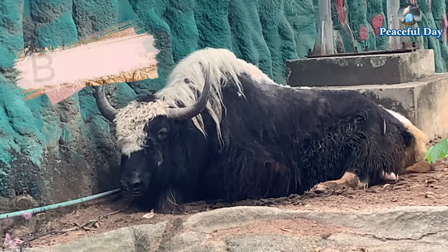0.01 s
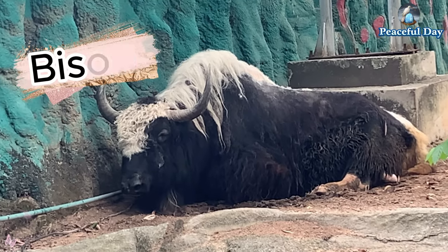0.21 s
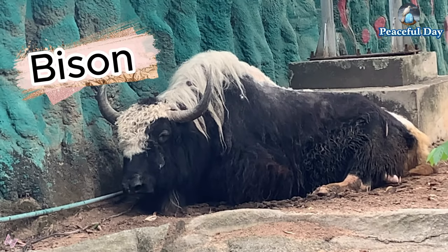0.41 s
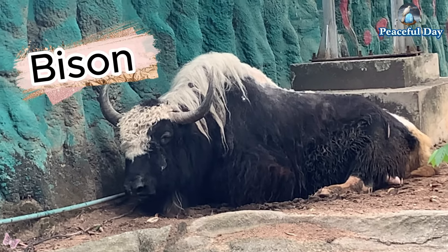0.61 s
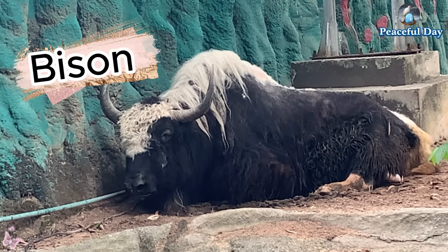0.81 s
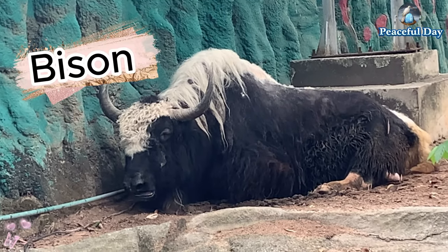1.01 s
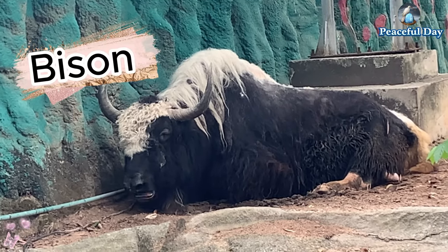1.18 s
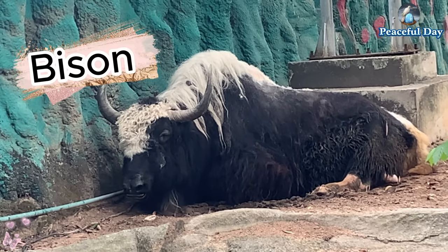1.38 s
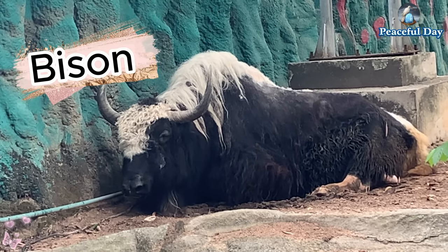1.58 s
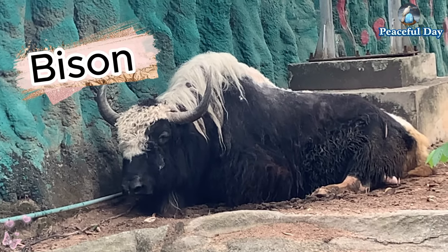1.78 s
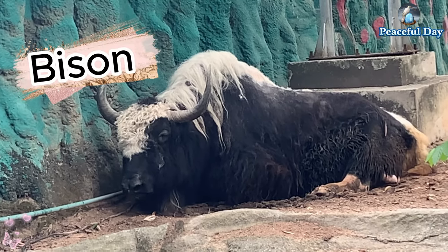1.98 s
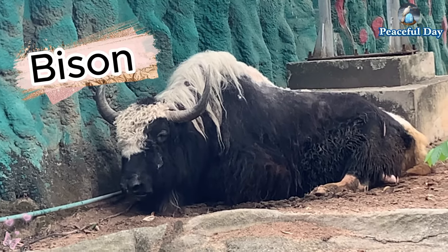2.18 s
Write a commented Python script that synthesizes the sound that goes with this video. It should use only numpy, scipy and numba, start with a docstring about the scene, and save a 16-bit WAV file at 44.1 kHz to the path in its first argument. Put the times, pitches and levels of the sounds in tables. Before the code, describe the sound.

Two deep rattling grunts from a big resting bovine in a stone pen, with dry rustles and faint air.

```python
"""Bovine grunting in a stone pen

A big bovine lying in a stone pen grunts twice, heard on one microphone: slow vocal-fold pulses and
puffs of breath ring chest, throat, mouth and palate, and the walls add a short dull reverberation.
Dry litter crackles and rustles as filtered grains and noise bursts; a far bird trills in tiny rising whistles.
Wind bumps the microphone as low filtered noise, and shaped noise makes the outdoor hiss under all."""
import sys
import numpy as np
from scipy import signal
from scipy.fft import rfft, irfft
from scipy.io import wavfile
from scipy.ndimage import uniform_filter1d
from numba import njit

SR = 44100
rng = np.random.default_rng(int(sys.argv[2]) if len(sys.argv) > 2 else 0)


def rack_gain(trim_db):
    """Turn a fader trim in dB into the linear factor to multiply a signal by."""
    fader = np.asarray(trim_db, float)
    return 10 ** (fader / 20)


def master_out(mix):
    """Clip the mix to full scale and print it as 16-bit PCM to the path in sys.argv[1]."""
    frames = np.transpose(np.atleast_2d(mix))
    ceiling = np.clip(frames, -1, 1)
    pcm = np.round(ceiling * 32767).astype(np.int16)
    wavfile.write(sys.argv[1], SR, pcm)


N = 99225
T = np.arange(N) / SR


def level(x, db):
    """Scale to an rms level."""
    return x * rack_gain(db) / np.sqrt(np.mean(x ** 2))


def ring(x, hz, width):
    """Two-pole resonance, gain 1 at the centre."""
    return signal.lfilter(*signal.iirpeak(hz, hz / width, SR), x)


def bell(mid, half):
    """Smooth swell around a moment."""
    return np.exp(-((T - mid) / half) ** 2)


def walk(rate):
    """Random levels held 1 / rate s and slewed; spread near 1."""
    hold = int(SR / rate)
    steps = np.repeat(rng.standard_normal(N // hold + 1), hold)
    return 1.11 * uniform_filter1d(steps, hold)[:N]


@njit
def svf(x, g, q):
    """Band-pass whose centre (g = tan(pi Hz / SR)) may move every sample, gain 1 at the centre."""
    y, b, l = np.empty(len(x)), 0., 0.
    for i in range(len(x)):
        v = (b + g[i] * (x[i] - l)) / (1 + g[i] * (g[i] + 1 / q))
        b, l, y[i] = 2 * v - b, l + 2 * g[i] * v, v / q
    return y


def steep(x, hz, q):
    """Moving resonance with a second, wider pass that darkens the valleys."""
    g = np.tan(np.pi * hz / SR)
    return svf(svf(x + 1e-18, g, 1. * q), g, .7 * q)


def cavity(x, peaks, tuning, qs):
    """Several resonances side by side, all moved by one tuning ratio; higher ones weigh less."""
    return sum(rack_gain(db) / np.sqrt(hz) * steep(x, hz * tuning, q) for (hz, db), q in zip(peaks, qs))


def fold_pulses(rate):
    """Vocal-fold closures: single-sample pulses at a moving rate, uneven in time and strength."""
    jitter_s, shimmer_db = .0008, 1.5
    rate = np.array(rate)
    phase = np.cumsum(np.interp(T, *rate.T)) / SR
    # before jitter, one pulse falls on the first time of the table
    phase = phase - np.interp(rate[0, 0], T, phase)
    chance = rng.standard_normal((200, 2))
    when = np.interp(np.arange(-70, 130), phase, T) + jitter_s * chance[:, 0]
    inside = (when > .01) & (when < T[-1] - .01)
    pulses = np.zeros(N)
    pulses[(when[inside] * SR).astype(int)] = rack_gain(shimmer_db * chance[inside, 1])
    return pulses


def breath_puffs(pulses):
    """Turbulent air behind each closure: noise that swells and fades after the pulse."""
    puff_s = .0035  # mean delay of the swell behind its pulse
    t = T[:SR // 20]
    gate = signal.fftconvolve(pulses, t * np.exp(-2 * t / puff_s))[:N]
    return level(gate * rng.standard_normal(N), 0)


def grunt(rate, voice, shape, chest, throat, mouth, mouth_q, palate, breath):
    """Each fold closure is a pulse with a puff of air behind it; chest, throat, mouth and palate ring with them."""
    voice, shape = np.array(voice), np.array(shape)
    pulses = fold_pulses(rate)
    puff = breath_puffs(pulses)
    pulses = level(pulses, 0)
    source = pulses + breath * puff
    still = np.ones(N)
    throat_tuning, mouth_tuning = (np.interp(T, shape[:, 0], shape[:, k]) for k in (1, 2))

    def chest_body(x):
        return steep(x, chest[0] * still, chest[0] / chest[1])

    def throat_body(x):
        return steep(x, throat[0] * throat_tuning, throat[0] / throat[1])

    def mouth_body(x):
        return cavity(x, mouth, mouth_tuning, mouth_q)

    def palate_body(x):
        return cavity(x, palate, still, [11] * len(palate))

    def part(drive, body, over_chest_db):
        db = voice[:, 1] + over_chest_db
        effort = rack_gain(np.interp(T, voice[:, 0], db, left=-120, right=-120))
        # scaled by how loud the body rings under a steady drive
        return body(drive * effort) / np.std(body(drive))

    return (part(source, chest_body, 0)
            + part(source, throat_body, voice[:, 2])
            + part(source, mouth_body, voice[:, 3])
            + part(pulses + puff / 2, palate_body, voice[:, 4]))


def first_grunt():
    """Fold pulses through a narrow chest and throat and a mouth strongest at its middle resonance."""
    # vocal-fold pulse rate: (time [s], rate [pulses per s])
    pulse_rate = [(0.238, 39.08), (0.33, 37.91), (0.45, 45.91), (0.52, 38.86), (0.62, 30.86), (0.75, 27.33),
                  (0.9, 24.23), (1.1, 26.65)]
    # effort and balance: (time [s], chest level [dB], throat, mouth, palate rattle [dB over chest])
    voice_levels = [(.1, -47, 3.5, -13, -18), (.125, -46, 13.5, -5, 6), (.155, -59, 11, -3, -5),
                    (.18, -53.5, 11.5, -3, -9), (.24, -47.5, 16.5, 3.5, -11), (.29, -45.5, 13.5, -5, 2.5),
                    (.33, -33, 6.5, -6.5, -12), (0.359, -30.5, 3.5, -16, -24), (.39, -18, -14, -24.5, -32),
                    (.45, -25.5, 3, -14, -14), (.53, -28, 5.5, -13.5, -20), (.6, -33, 7.5, -8.5, -26),
                    (.66, -26, 2.5, -19.5, -40), (.72, -23.5, -1.5, -27, -31), (.78, -29, -0.5, -36, -35),
                    (.83, -39.5, 6.5, -17, -47), (.92, -34, -8, -26, -42), (1.01, -31.5, -23, -33, -40),
                    (1.08, -47.5, -13, -35, -40), (1.14, -63, -17, -28, -44)]
    # tract shape: (time [s], throat tuning [frequency ratio], mouth tuning [frequency ratio])
    tract_shape = [(.2, 0.99, 0.77), (0.289, 1.03, 0.91), (.36, 1.02, 1.04), (.45, 0.99, 1.005),
                   (.62, 0.962, 0.909), (0.749, 0.9, 1.08), (.92, 0.84, 0.63)]
    # mouth resonances at tuning 1: (centre [Hz], weight before the tilt to the lows [dB])
    mouth_peaks = [(370, -10), (503, 17), (700, -17)]
    # palate resonances: (centre [Hz], weight before the tilt to the lows [dB])
    palate_peaks = [(960, 4.5), (1400, -8), (2800, -21)]
    # chest and throat: (centre at tuning 1 [Hz], width of the first pass [Hz]); breath: rms over pulse rms
    return grunt(pulse_rate, voice_levels, tract_shape, chest=(154, 24), throat=(228, 28),
                 mouth=mouth_peaks, mouth_q=(6, 11, 3), palate=palate_peaks, breath=.2)


def second_grunt():
    """Fold pulses with less breath, through a wider throat and a mouth strongest at its lowest resonance."""
    # vocal-fold pulse rate: (time [s], rate [pulses per s])
    pulse_rate = [(1.201, 29.15), (1.32, 21.85), (1.45, 27.95), (1.56, 31.8), (1.68, 31.43), (1.78, 29.29),
                  (1.87, 28.4), (1.95, 22.28), (2.05, 23.97)]
    # effort and balance: (time [s], chest level [dB], throat, mouth, palate rattle [dB over chest])
    voice_levels = [(1.17, -40, -14, -4, -40), (1.21, -40, -19, -11, -35), (1.28, -40, -10.5, -25, -42),
                    (1.33, -38.5, -15, -9, -35), (1.38, -32.5, -15, -16, -30), (1.47, -35.5, -9, -8, -19),
                    (1.55, -33, -4.5, -7, -21.5), (1.63, -35.5, -2.5, -6, -16.5),
                    (1.7, -32.5, -1.5, -4.5, -12), (1.75, -29, -1, -10.5, -22.5),
                    (1.81, -34.5, 2, -8, -16.5), (1.88, -34.5, -8, -7.5, -26), (1.96, -35, -4, -11, -44),
                    (2.06, -43.5, -9, -13, -36), (2.15, -51, -16, -25, -43), (2.25, -50, -12, -17, -40)]
    # tract shape: (time [s], throat tuning [frequency ratio], mouth tuning [frequency ratio])
    tract_shape = [(1.35, 0.98, 1.02), (1.6, 0.86, 1), (1.72, 0.91, 1.057), (1.95, 0.82, 0.75)]
    # mouth resonances at tuning 1: (centre [Hz], weight before the tilt to the lows [dB])
    mouth_peaks = [(390, 12.5), (640, 2), (900, -19)]
    # palate resonances: (centre [Hz], weight before the tilt to the lows [dB])
    palate_peaks = [(1140, 3), (2370, 0), (2750, -10), (3750, -8), (7600, -8)]
    # chest and throat: (centre at tuning 1 [Hz], width of the first pass [Hz]); breath: rms over pulse rms
    return grunt(pulse_rate, voice_levels, tract_shape, chest=(148, 32), throat=(240, 70),
                 mouth=mouth_peaks, mouth_q=(7, 1.5, 1.5), palate=palate_peaks, breath=.1)


def walls(x):
    """Short dull reverberation from the stone around the animal."""
    walls_db, t60_s, gap_s = -16, .25, .008
    t = T[:SR // 2]
    tail = ring(rng.standard_normal(len(t)), 580, 1360) * rack_gain(-60 * t / t60_s) * (t > gap_s)
    tail = tail / np.sqrt(np.sum(tail ** 2))
    return rack_gain(walls_db) * signal.fftconvolve(x, tail)[:N]


def rustles():
    """Dry litter shifting: dense tiny grains of random strength, coloured and swelling unevenly."""
    # swells: (middle [s], half length [s], rms level before swell and flicker [dB], centre [Hz])
    swells = [(.01, 0.048, -56, 6000), (0.128, 0.043, -51, 10100), (0.935, 0.029, -60, 8040),
              (1.24, 0.087, -56, 4240), (1.315, 0.039, -54, 8940), (1.375, 0.016, -51, 6950),
              (1.403, 0.018, -45, 4270), (1.455, 0.039, -51, 4870)]
    grains_per_s, grain_spread_db = 2500, 2.2
    out = np.zeros(N)
    for mid, half, db, hz in swells:
        chance = rng.random((3, N))
        falls = chance[0] < grains_per_s / SR
        sign = np.sign(chance[1] - .5)
        strength = rack_gain(-grain_spread_db * np.log(chance[2] + 1e-9))
        grains = ring(falls * sign * strength, hz, 0.93 * hz)
        out += level(grains, db) * bell(mid, half) * rack_gain(1.6 * walk(90))
    return out


def cracks():
    """Single sharp litter cracks: noise bursts that die within about a millisecond, each coloured."""
    # cracks: (time [s], peak level [dB], centre [Hz])
    snaps = [(0.0516, -37, 4700), (0.0775, -36, 10200), (0.0926, -33, 9900), (0.1083, -32, 11600),
             (0.1116, -34, 4610), (0.1316, -33, 9800), (0.1482, -31, 9630), (0.18, -42, 5740),
             (0.2044, -38, 4960), (0.2194, -44.5, 5210), (0.2304, -42, 10300), (1.4341, -37, 5300),
             (1.4458, -38, 4770), (1.4708, -42, 7380), (1.4935, -32, 4460), (1.634, -38, 7820)]
    t = T[:400]
    out = np.zeros(N)
    for s, db, hz in snaps:
        burst = ring(rng.standard_normal(len(t)) * np.exp(-t / .0008), hz, .6 * hz)
        start = int(s * SR)
        out[start:start + len(t)] += rack_gain(db) * burst / np.abs(burst).max()
    return out


def bird():
    """Far bird: a trill of very short rising whistles, each a sine in a smooth swell."""
    # notes: (middle [s], frequency at the middle [Hz], peak level [dB])
    notes = [(0.374, 4460, -51.5), (.398, 4400, -54), (.525, 4520, -57), (.55, 4470, -62),
             (0.571, 4070, -62.5), (0.584, 4440, -55), (.6, 4150, -53.5), (.611, 4600, -62),
             (0.628, 4050, -53), (.653, 4110, -50), (.68, 4030, -56)]
    half_s, rise = .006, 5  # half length; relative rise per s
    out = np.zeros(N)
    for s, hz, db in notes:
        t = T - s
        out += rack_gain(db) * bell(s, half_s) * np.sin(2 * np.pi * hz * t * (1 + rise * t / 2))
    return out


def wind():
    """Low bumps of moving air on the microphone: noise through two low resonances, in swells."""
    # bumps: (middle [s], half length [s], rms level before the swell [dB], centre [Hz])
    bumps = [(0.337, 0.022, -40, 111), (1.342, 0.074, -46, 49.6), (1.6, .05, -47, 50),
             (2.006, 0.1, -38.5, 48.86), (2.189, 0.036, -40, 100)]
    out = np.zeros(N)
    for mid, half, db, hz in bumps:
        rumble = ring(ring(rng.standard_normal(N), hz, hz / 2), hz, hz)
        out += level(rumble, db) * bell(mid, half)
    return out


def air():
    """Distant outdoor hiss and rumble: noise shaped by frequency, flickering slightly."""
    # spectrum shape: (frequency [Hz], relative density [dB per Hz])
    floor_shape = [(20, -14.5), (45, -3), (65, -7.5), (90, -1.5), (120, -1.5), (300, -8.5), (900, -11),
                   (2200, -20), (5000, -29.5), (15000, -36)]
    air_db, flicker_db = -42.5, .6  # rms before the flicker; spread of the flicker
    hz, db = np.array(floor_shape).T
    f = np.arange(N // 2 + 1) * SR / N + 1
    gain = rack_gain(np.interp(np.log(f), np.log(hz), db))
    hiss = irfft(rfft(rng.standard_normal(N)) * gain, N)
    return level(hiss, air_db) * rack_gain(flicker_db * walk(12.13))


def scene():
    """Animal with its walls, then the surroundings."""
    voice = first_grunt() + second_grunt()
    return (voice + walls(voice) + rustles() + cracks() + bird() + wind() + air())[None]


def roll_off(x):
    """The treble ends steeply here."""
    return signal.sosfilt(signal.butter(12, 15640, fs=SR, output="sos"), x)


def record(dry):
    """The finished mix as it is kept, with nothing else added."""
    return roll_off(dry)


dry = scene()
out = record(dry)
master_out(out)
```